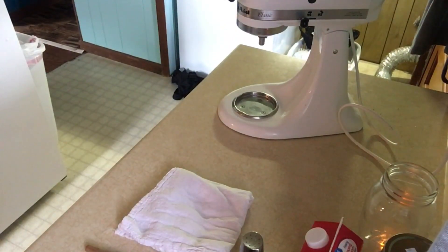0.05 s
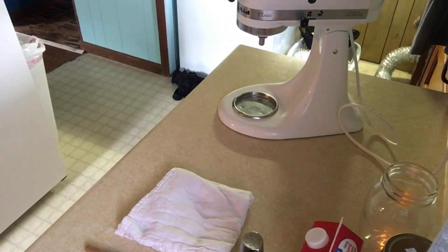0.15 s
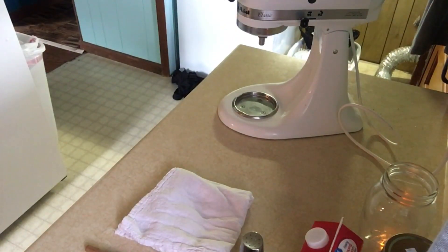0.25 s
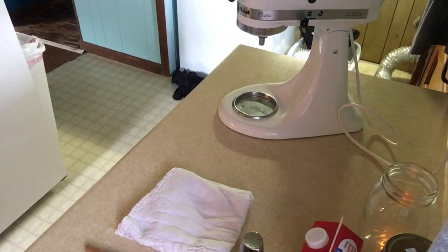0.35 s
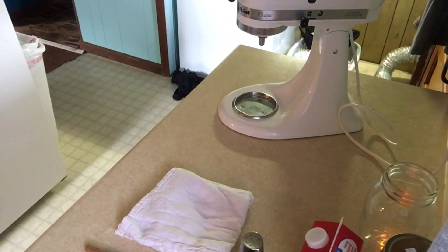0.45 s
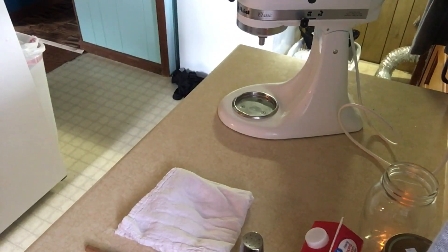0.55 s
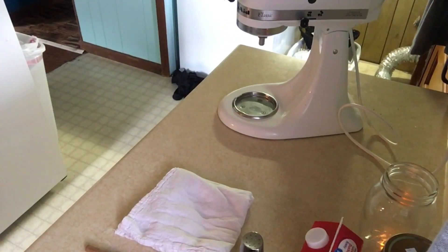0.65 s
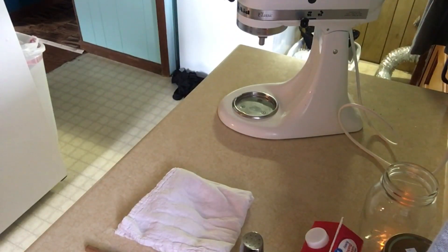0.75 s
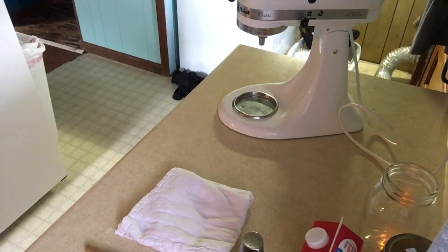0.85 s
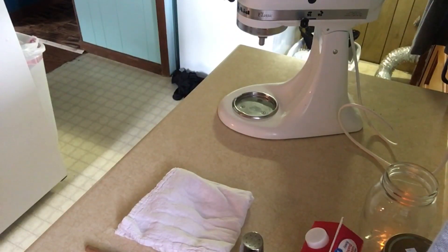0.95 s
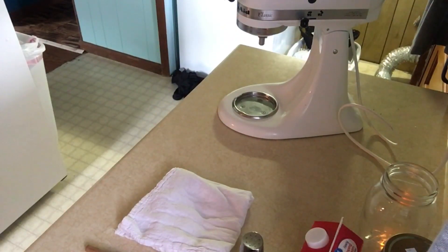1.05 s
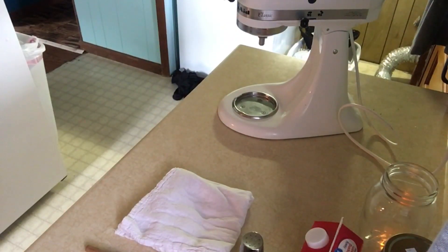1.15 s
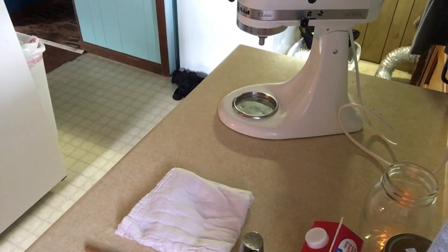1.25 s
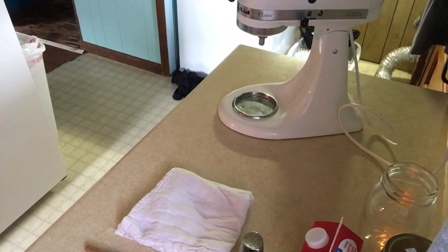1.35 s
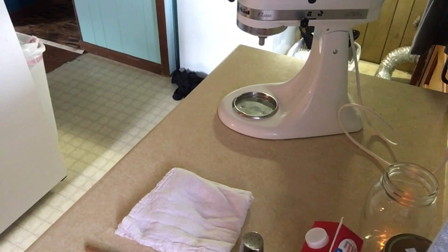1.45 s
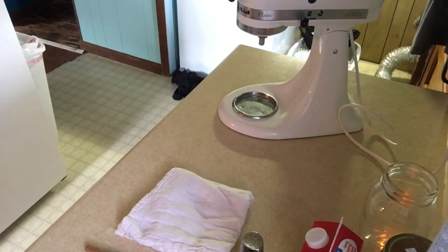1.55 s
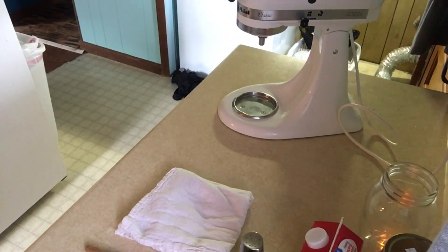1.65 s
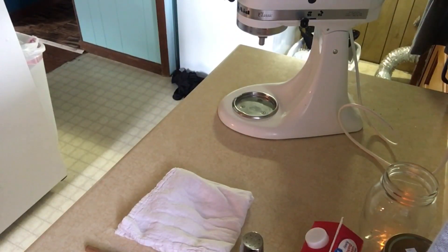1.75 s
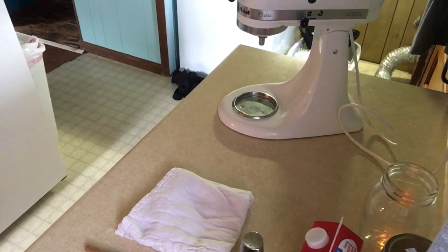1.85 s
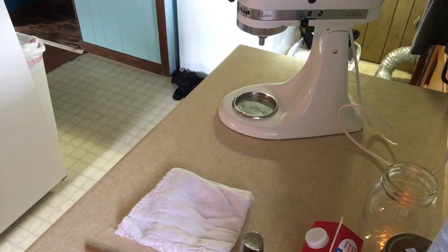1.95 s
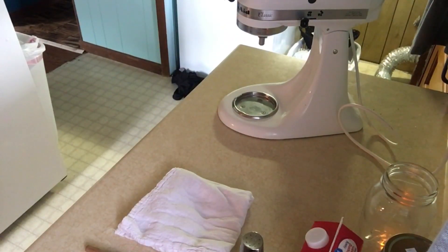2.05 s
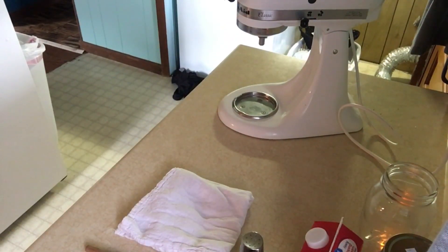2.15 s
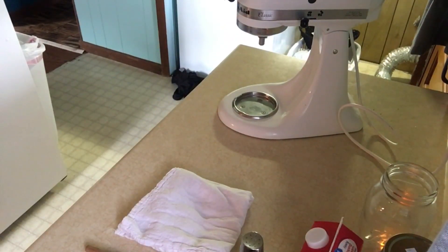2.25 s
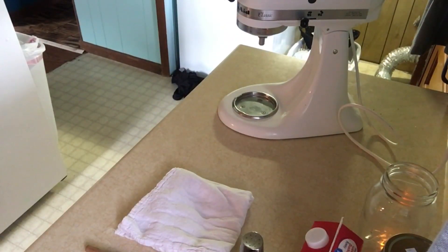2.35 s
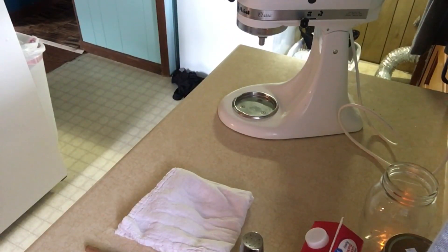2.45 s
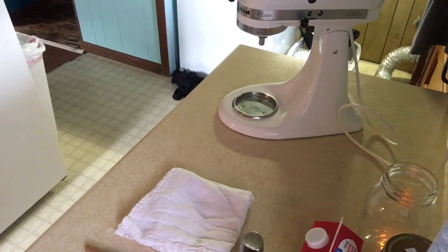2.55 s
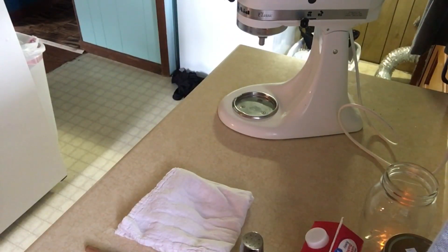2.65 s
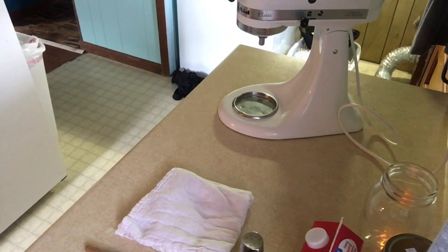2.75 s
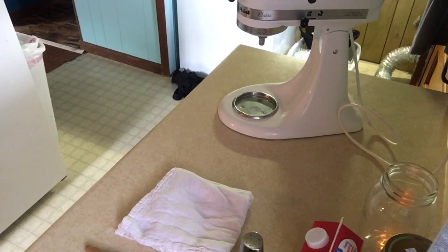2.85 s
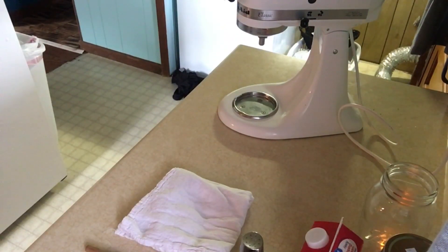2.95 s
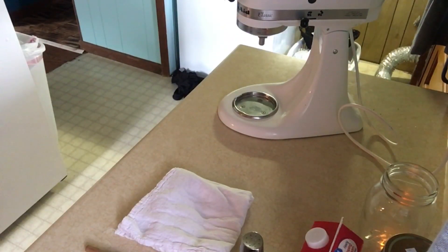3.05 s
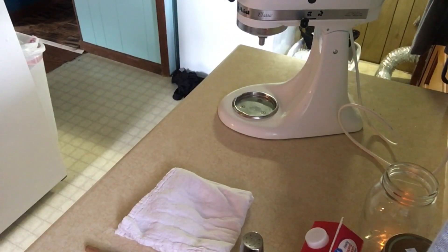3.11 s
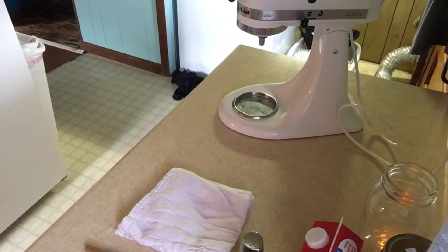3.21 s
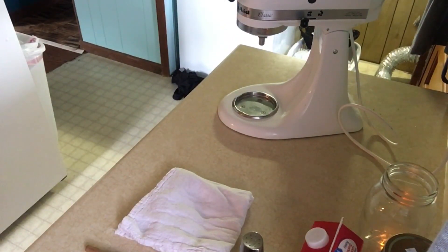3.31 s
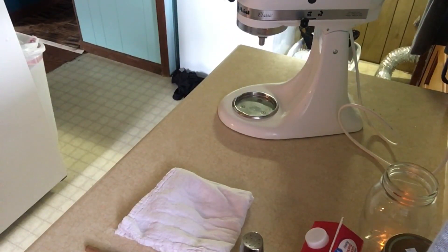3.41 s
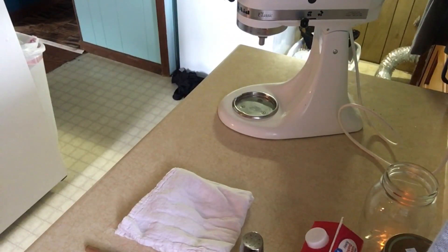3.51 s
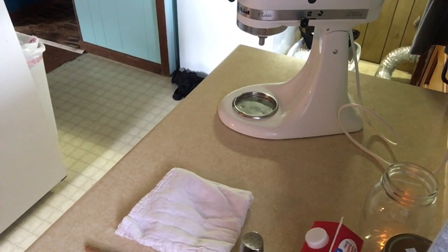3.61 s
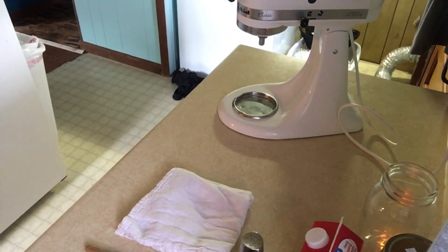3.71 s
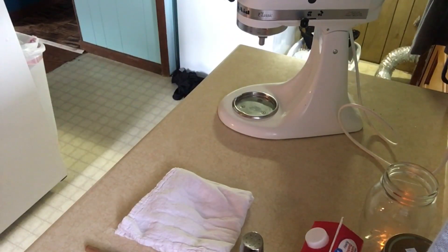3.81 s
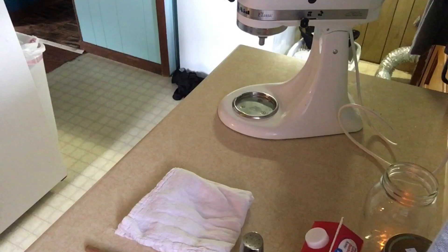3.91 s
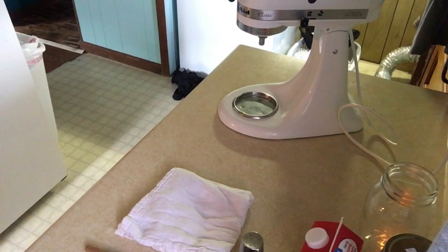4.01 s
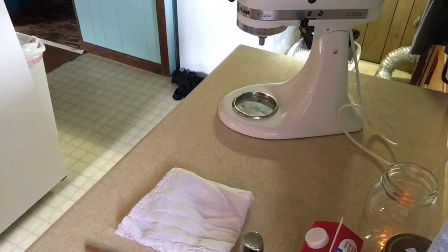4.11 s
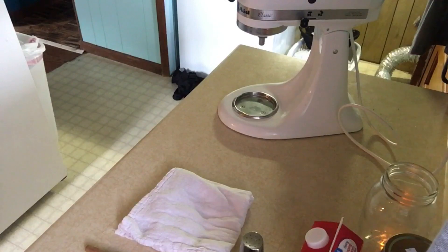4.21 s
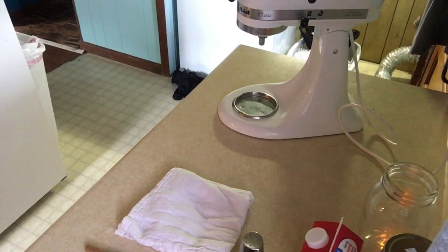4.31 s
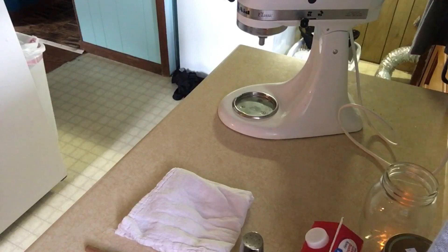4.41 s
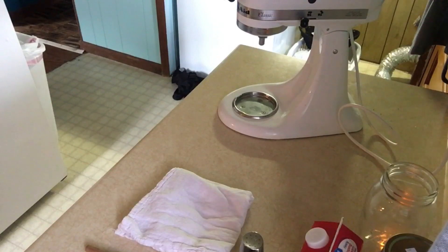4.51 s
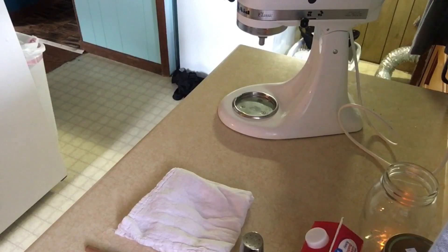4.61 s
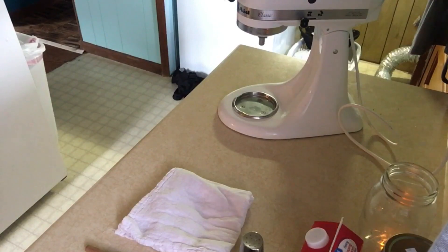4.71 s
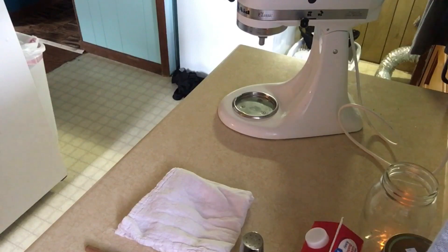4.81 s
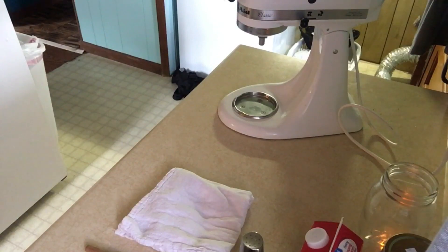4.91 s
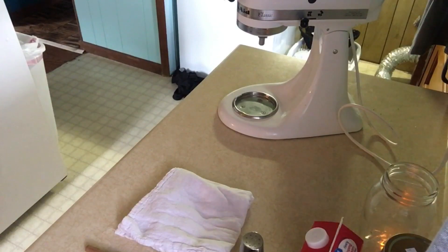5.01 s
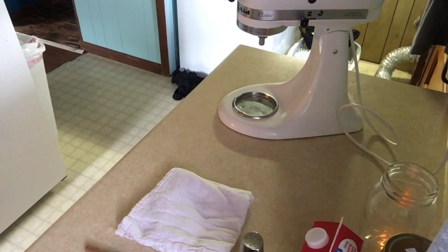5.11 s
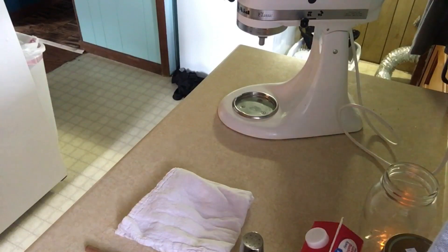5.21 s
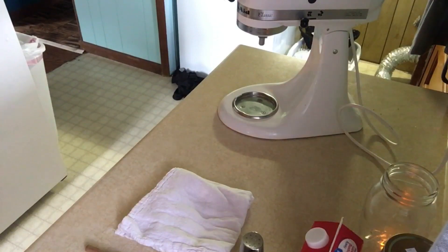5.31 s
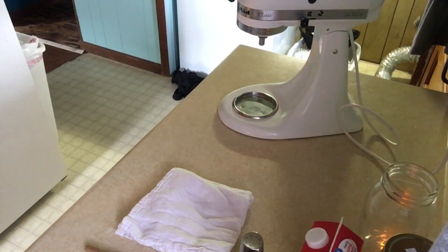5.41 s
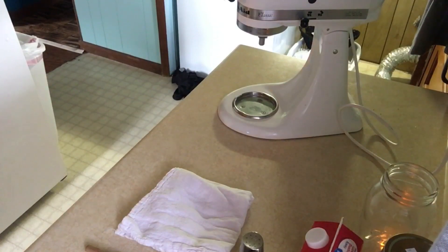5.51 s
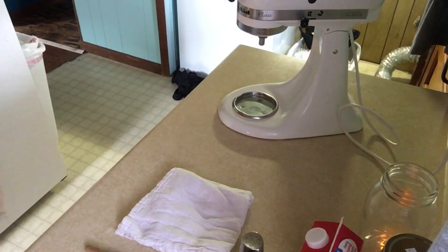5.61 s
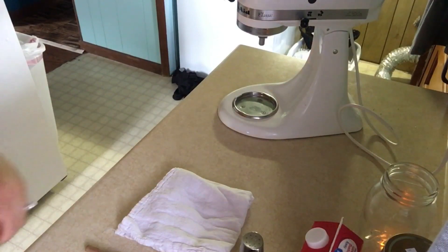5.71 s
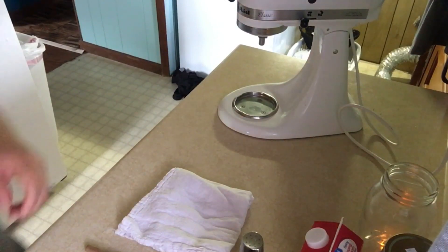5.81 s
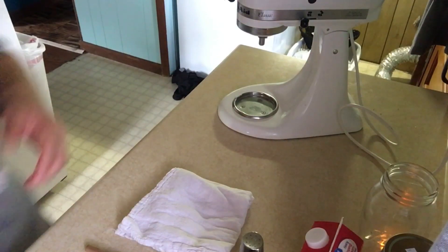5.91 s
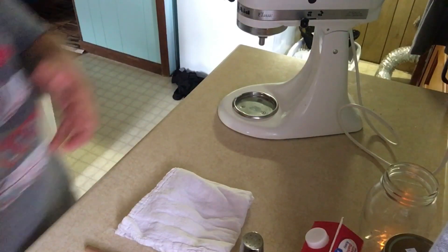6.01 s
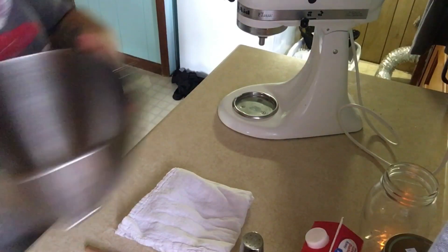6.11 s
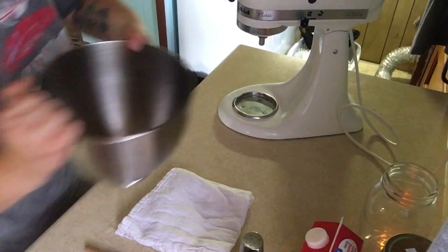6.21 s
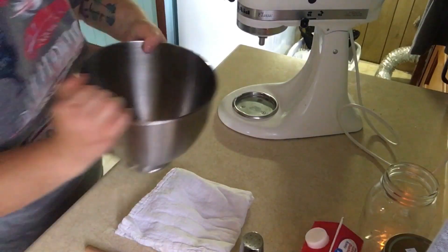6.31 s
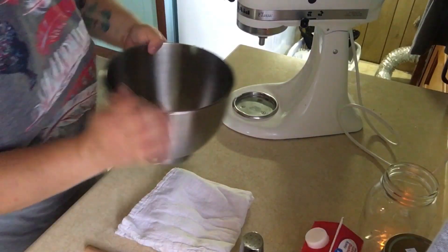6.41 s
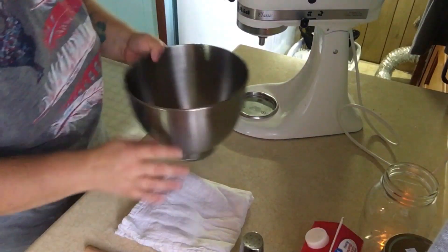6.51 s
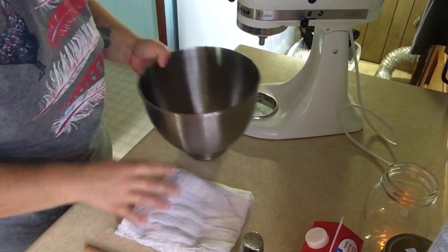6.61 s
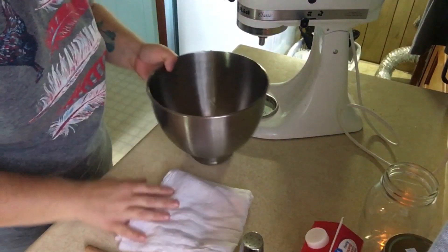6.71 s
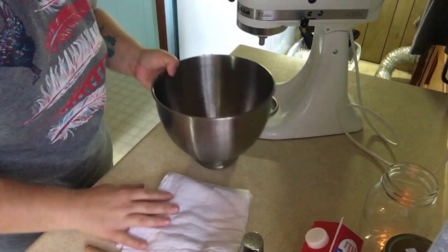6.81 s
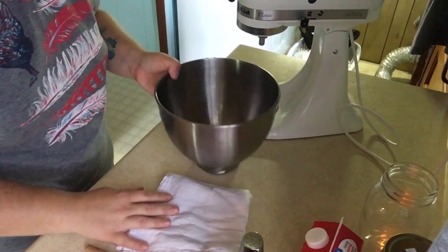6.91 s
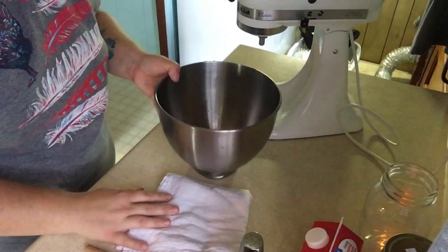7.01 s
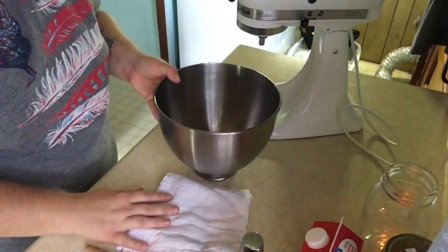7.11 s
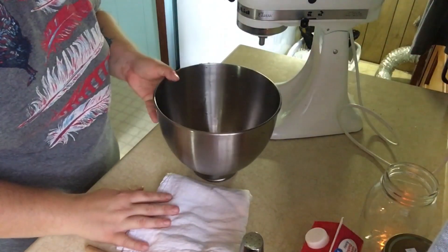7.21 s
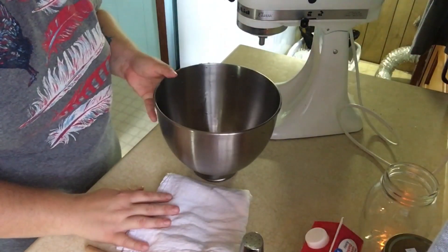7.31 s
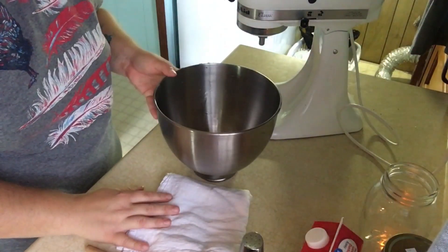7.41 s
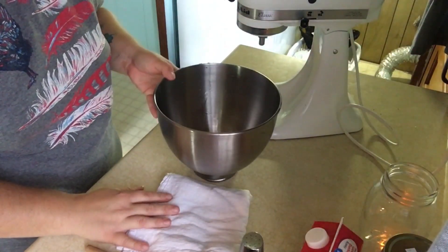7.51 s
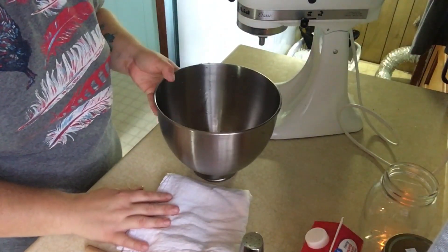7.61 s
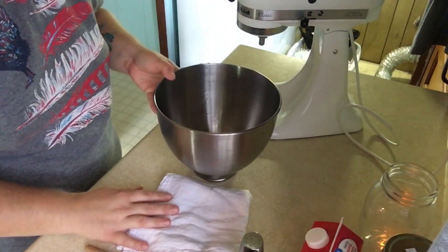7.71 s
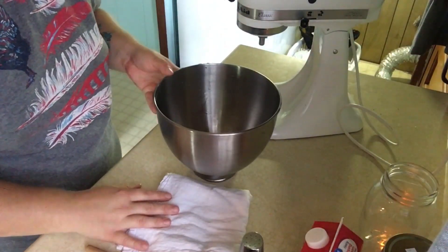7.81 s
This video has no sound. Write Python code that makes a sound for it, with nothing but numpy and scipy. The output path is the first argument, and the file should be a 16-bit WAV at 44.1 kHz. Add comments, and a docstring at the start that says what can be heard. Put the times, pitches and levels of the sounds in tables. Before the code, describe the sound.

A low room murmur lies under everything, in a small kitchen with a short echo. From 0 s a tap across the room hisses and splashes into a steel bowl, spray shifting as the bowl turns, the basin drumming softly underneath. A light clank and thumps come in the first 0.2 s, with dull bumps near 0.9 and 1.4 s. At about 3.7 s the jet quickly dies; from 3.9 to 4.8 s rinse water slops, glugs and gushes out in bubbly clumps, with a thump at 4.6. At 5.3 s the bowl clangs hard on the sink, bright and ringing, with hollow booms tumbling until 5.7. A faint drain trickle with small plinks remains. Cloth rustles and light ticks pass from 6.1 to 6.6 s. At 6.7 s the bowl lands sharply on the nearby counter, knocks more dully at 7.06, then soft towel presses follow, with a last tick and press around 7.7 s.

```python
"""In a kitchen, a tap runs into a steel mixer bowl and drums on the sink; the water is swirled and tipped out.
The bowl clanks on the sink, which booms, then is carried over and set down on the counter close by.
It knocks there once more and a hand presses on a towel while the drain goes on trickling.
Water is shaped noise plus chirping bubbles; steel, sink and counter are sets of dying tones plus short noise."""
import sys
import numpy as np
from scipy import signal
from scipy.fft import rfft, irfft, next_fast_len
from scipy.io import wavfile
from scipy.ndimage import map_coordinates

SR = 44100
rng = np.random.default_rng(int(sys.argv[2]) if len(sys.argv) > 2 else 0)


def materialize(psi):
    """Save the field psi as 16-bit PCM at rate SR to the path in sys.argv[1].

    A 1-D psi becomes a single channel; in a 2-D psi each row is a channel.
    """
    bounded = np.clip(np.atleast_2d(psi).T, -1, 1)
    quanta = np.round(bounded * 32767).astype(np.int16)
    wavfile.write(sys.argv[1], SR, quanta)


N = 346229
TIME = np.arange(N) / SR  # seconds through the scene
AGE = np.arange(SR * 2 // 3) / SR  # seconds since one blow or bubble began
# Levels in all tables are relative: the functions trim them when mixing.
# t60 is the time a sound takes to fall by 60 dB.


def amp(db):
    """Turn decibels into a gain."""
    return 10 ** (np.asarray(db) / 20)


def unit(x):
    """Scale to rms 1."""
    return x / np.sqrt(np.mean(x ** 2) + 1e-20)


def strike(x):
    """Scale a blow to rms 1 over its first 25 ms."""
    return x / np.sqrt(np.mean(x[:SR // 40] ** 2) + 1e-20)


def along(points, hz):
    """Read a curve of (f/Hz, value) points on a log frequency axis."""
    f, value = np.transpose(points)
    return np.interp(np.log(hz + 1), np.log(f), value)


def wobble(rate):
    """Draw a smooth random curve with rate knots a second."""
    knots = rng.standard_normal(int(N * rate / SR) + 4)
    return map_coordinates(knots, [TIME * rate])


def filtered(x, response):
    """Multiply the spectrum of x by a response of frequency."""
    m = next_fast_len(len(x) + 8192)
    hz = np.fft.rfftfreq(m, 1 / SR)
    return irfft(rfft(x, m) * response(hz), m)[:len(x)]


def coloured(x, spectrum):
    """Filter x by a spectrum table, then scale to rms 1."""
    return unit(filtered(x, lambda hz: amp(along(spectrum, hz))))


def hump(hz, centre_hz, octaves):
    """A bell-shaped gain on the log frequency axis."""
    return 1 / (1 + (np.log2((hz + 1) / centre_hz) / octaves) ** 2) ** 2


def gate(start, length, rise, release):
    """An envelope that builds from start, holds to the end of length seconds and dies away."""
    age = np.maximum(TIME - start, 0)
    return (1 - np.exp(-age / rise)) * np.exp(-np.maximum(age - length, 0) / release)


def add(track, s, x):
    """Mix x into the track at time s."""
    part = track[max(round(s * SR), 0):][:len(x)]
    part += x[:len(part)]


def burst(spectrum, t60, attack):
    """Countless short-lived tones heard together as dying noise."""
    noise = coloured(rng.standard_normal(len(AGE)), spectrum)
    return strike(noise * amp(-60 * AGE / t60) * (1 - np.exp(-AGE / attack)))


def puff(centre_hz, octaves, rise):
    """A band of noise that swells for rise seconds and dies away."""
    band = unit(filtered(rng.standard_normal(len(AGE)), lambda hz: hump(hz, centre_hz, octaves)))
    return band * AGE / rise * np.exp(1 - AGE / rise)


def ring(modes, attack, beat=0):
    """Dying tones; in a not quite round bowl each has a close twin that beats with it."""
    hz, db, t60 = np.transpose(modes)[:, :, None]
    phase, split = rng.random((len(hz), 2)).T[:, :, None]
    waves = np.sin(np.float32(2 * np.pi * (hz * AGE + phase)))
    if beat:
        twin_hz = hz + 8 + 16 * split
        waves = waves + beat * np.sin(np.float32(2 * np.pi * (twin_hz * AGE + phase)))
    decay = np.exp(-np.log(1000) * AGE / t60)
    return strike((amp(db) * decay * waves).sum(0) * (1 - np.exp(-AGE / attack)))


def bubble(t, hz, cycles, rise):
    """A bubble rings a few cycles and rises in pitch as it nears the surface."""
    life = hz * t / cycles
    tone = np.sin(2 * np.pi * hz * t * (1 + rise * life / (1 + life)))
    return tone * np.exp(-life) * (1 - np.exp(-10 * life))


def bubbles(rate, pitch_hz, spread, cycles, size_db, rise):
    """A random stream of rate bubbles a second at rms 1, with random pitches and levels."""
    when, size, u, v = rng.random((int(rate * N / SR), 4)).T[:, :, None]
    bell = np.sqrt(-2 * np.log(1 - u)) * np.cos(2 * np.pi * v)  # bell-curve random numbers
    hz = np.clip(pitch_hz * np.exp(spread * bell), 200, SR / 3)
    loudness = amp(-size_db * np.log(1 - .96 * size))  # many small, a few large
    t = AGE[:int(4 * SR * cycles / pitch_hz)]
    waves = bubble(np.float32(t), np.float32(hz), cycles, rise) * loudness
    at = (when * N).astype(int) + np.arange(len(t))
    return unit(np.bincount(at.ravel(), waves.ravel(), N)[:N])


# colour of the steady background: f/Hz, level/dB (per Hz)
BACKGROUND_COLOUR = [(25, -31), (40, -11), (60, 5), (99, -12), (145, 3), (190, -6), (260, -2), (350, -12.5),
                     (425, -10), (520, -13.5), (780, -16), (1020, -8), (1800, -18), (2700, -20),
                     (5300, -29.5), (8500, -37.5), (15800, -44.5)]


def background():
    """A steady low murmur made of coloured noise."""
    return amp(-51) * coloured(rng.standard_normal(N), BACKGROUND_COLOUR)


# the basin's tones under falling water: f/Hz, width/Hz, level/dB
DRUM_TONES = [(70, 18, -4), (116, 28, -14), (152, 12.5, 3), (179, 12, -27), (225.5, 9, -5.5),
              (251, 25, -7.5), (314.5, 8.7, -5.5), (440, 15, -18)]


def drumming():
    """Falling water shakes the basin at its resonances: filtered noise at rms 1."""
    def basin(f):
        response = 0
        for k, (centre, width, db) in enumerate(DRUM_TONES):
            damping = 1j * f * width
            sign = (-1) ** k  # neighbours swing opposite ways
            response = response + sign * amp(db) * damping / (centre ** 2 - f ** 2 + damping)
        return response
    return unit(filtered(rng.standard_normal(N), basin))


# the jet as the bowl turns under it: t/s, splash level/dB, spray level/dB
JET_LEVELS = [(0, -46, -53), (.6, -50, -54), (.85, -46, -50.5), (1.55, -48, -53.5), (1.83, -47.5, -51),
              (1.97, -53.5, -57), (2.52, -50, -54.5), (3.1, -54, -60.5), (3.7, -51, -56)]
# colour of the splash: f/Hz, level/dB (per Hz)
SPLASH_COLOUR = [(300, -21), (560, -16), (800, -24), (1030, 1.5), (1450, 3.5), (2200, -3.5), (2550, 1),
                 (3400, -1), (4200, -4), (7000, -34), (12000, -56)]
# colour of the fine spray, also used when pouring: f/Hz, level/dB (per Hz)
SPRAY_COLOUR = [(2000, -10.5), (4200, -3.5), (5200, 0), (6800, -0.5), (8200, -5), (9500, -5.5),
                (10300, -12), (11300, -7.5), (15800, -10.5)]
TAP_OFF_S, TAP_FADE_S = 3.7, 0.18  # the jet leaves the bowl and dies away (time constant)
DRUM_DB, DRUM_SAG_DB_PER_S, DRUM_FADE_S = -50.5, 2, 1  # gathering water cushions the basin


def tap():
    """The jet splashes in the bowl, throws fine spray and drums on the basin."""
    s, splash_db, spray_db = np.transpose(JET_LEVELS)
    splash = amp(np.interp(TIME, s, splash_db) - 2.5)
    spray = amp(np.interp(TIME, s, spray_db))
    since_off = np.maximum(TIME - TAP_OFF_S, 0)
    clusters = amp(1.1 * wobble(13))  # air is dragged under in bunches
    froth = clusters * bubbles(rate=420, pitch_hz=2900, spread=.38, cycles=6, size_db=3.3, rise=.04)
    fizz = clusters * bubbles(rate=380, pitch_hz=5600, spread=.27, cycles=13, size_db=4, rise=.03)
    body = coloured(rng.standard_normal(N) + amp(-6.5) * froth, SPLASH_COLOUR)
    rough_hiss = rng.standard_normal(N) * amp(2.3 * wobble(400))
    mist = coloured(rough_hiss + amp(-10) * fizz, SPRAY_COLOUR)
    drum_level = amp(DRUM_DB - DRUM_SAG_DB_PER_S * TIME) * np.exp(-since_off / DRUM_FADE_S)
    flutter = amp(.8 * wobble(25))
    jet = flutter * np.exp(-since_off / TAP_FADE_S) * (splash * body + spray * mist)
    return jet + drum_level * drumming()


# the clearest bubbles in the drain: t/s, peak level/dB, f/Hz
PLINKS = [(5.223, -39.5, 2340), (6.595, -41, 2990), (6.6644, -45, 3520), (7.185, -43, 2500),
          (7.3761, -45, 3210), (7.5534, -44.5, 2950)]


def drain():
    """Water trickles down the drain as a stream of bubbles with a few clear plinks."""
    trickle = amp(-60) * bubbles(rate=100, pitch_hz=2400, spread=0.317, cycles=15, size_db=1, rise=0.065)
    for s, db, hz in PLINKS:
        add(trickle, s, amp(db + 1) * bubble(AGE, hz, cycles=26, rise=0.056))
    return trickle


def shimmer(count, low_hz=2600, octaves=2.3, tilt_db=-6, t60=0.54):
    """A crowd of high tones in the thin steel wall, weaker toward the top."""
    place, size, life = rng.random((count, 3)).T
    octave = (np.arange(count) + place) / count * octaves
    hz = low_hz * 2 ** octave
    level = tilt_db * octave - 10 * size
    return ring(np.transpose([hz, level, t60 * (.5 + life)]), attack=0.0015)


# the bowl clanks on the sink: t/s, peak level/dB, ring level/dB, brightness level/dB
CLANKS = [(0.057, -21, 8, -7), (5.34, -6.5, 2, -10), (5.492, -21, -11, -16)]
# noise of the clank, and its high sizzle: f/Hz, level/dB (per Hz)
CLASH_COLOUR = [(45, -4), (90, -11), (300, 6), (650, 1), (800, -9), (1150, 4.5), (1500, -5.5), (2400, -3.5),
                (4000, -9.5), (5500, -6), (9000, -55)]
SIZZLE_COLOUR = [(2500, -39), (4200, 1), (4900, -2.5), (5700, 1), (6300, 0), (7300, 2.5), (9000, -9),
                 (11000, -12), (15800, -14)]
# tones of the bowl struck on the rim: f/Hz, level/dB, t60/s
RIM_TONES = [(1120, -1.5, 0.62), (1305, -9, .4), (1630, -17, 0.73), (2360, -8, .16), (4120, -8, 0.76),
             (4170, 0, 0.44), (4500, -3, .22), (5300, -15, 1), (5459, -3, .16), (6560, -15, 1),
             (7450, 0, .3), (9150, -14, 0.35), (9195, 10, .16), (11000, -1, 0.29)]
# blows on the basin: t/s, boom level/dB, boom f/Hz, knock level/dB, knock f/Hz, smack level/dB
THUMPS = [(0.055, -37, 330, -21, 476, -25), (0.199, -26, 330, -22.5, 414, -45),
          (0.89, -25, 153, -24.5, 420, -21.5), (1.434, -31, 150, -37, 304, -34),
          (4.602, -24, 227, -21.5, 330, -36), (5.34, -12, 174, -6, 270, -24),
          (5.373, -13.5, 150, -14.5, 580, -14.5), (5.428, -20.5, 140, -17.5, 514, -24),
          (5.489, -10, 246, -26, 252, -23), (5.571, -22, 280, -42, 400, -32.5),
          (5.624, -24, 244, -34, 279, -30), (5.7, -26.5, 238, -36, 251, -37)]
# tones of the basin: f/Hz, level/dB, t60/s
BASIN_TONES = [(54.6, 6, 0.92), (97, 4.5, .11), (148.2, 3, .3), (229.8, 2, 0.17), (264, 2, 0.17),
               (330, -12.5, 0.14), (422.7, -3.5, 0.16), (525, -11, 0.047), (631, -0.5, 0.08)]
# noise of the smack: f/Hz, level/dB (per Hz)
SMACK_COLOUR = [(200, -12), (500, 5), (750, -15.5), (1100, 2.5), (2000, -4), (2800, -12), (10000, -27)]
# the bowl judders along the basin: t/s, length/s, level/dB, centre f/Hz
SCRAPES = [(0.217, 0.061, -44, 427), (5.578, .035, -47.5, 427)]


def sink():
    """The rim clashes and rings; the thin basin booms at a pitch that depends on where it is hit."""
    out = np.zeros(N)
    for s, db, ring_db, bright_db in CLANKS:
        sizzle = burst(SIZZLE_COLOUR, t60=0.075, attack=.0007) + amp(-12) * shimmer(count=40)
        clash = burst(CLASH_COLOUR, t60=0.24, attack=0.00023) + amp(bright_db + 3.5) * sizzle
        # a gentle touch lasts longer and wakes fewer of the high tones
        reach_hz = 22000 * amp(db - 3)
        modes = [(hz, level - 40 * np.log10(1 + (hz / reach_hz) ** 2), t60) for hz, level, t60 in RIM_TONES]
        steel = ring(modes, attack=0.0026, beat=0.35)
        add(out, s - .001, amp(db - 17) * clash + amp(db + ring_db - 28) * steel)
    for s, boom_db, boom_hz, knock_db, knock_hz, smack_db in THUMPS:
        # tones near the boom's pitch answer most
        modes = [(hz, level + 20 * np.log10(hump(hz, boom_hz, octaves=1)), t60)
                 for hz, level, t60 in BASIN_TONES]
        boom = amp(boom_db - 13.5) * ring(modes, attack=0.0042)
        knock = amp(knock_db - 11) * puff(knock_hz, octaves=0.69, rise=0.0051)
        smack = amp(smack_db - 17.5) * burst(SMACK_COLOUR, t60=0.1, attack=0.00058)
        add(out, s, boom + knock + smack)
    for s, length, db, hz in SCRAPES:
        slips = rng.standard_normal(N) * amp(4.8 * wobble(170))
        judder = unit(filtered(slips, lambda f: hump(f, hz, octaves=0.81)))
        out += amp(db) * gate(s, length, rise=0.011, release=.035) * judder
    return out


# the jet drags under a bunch of bubbles: t/s, length/s, level/dB, f/Hz
SPURTS = [(0.47, 0.025, -51.5, 2980), (0.59, 0.024, -52, 5000), (.9, 0.052, -53, 6270),
          (1.065, 0.074, -56, 6440), (1.112, 0.026, -50, 3100), (1.182, 0.083, -53, 3120),
          (1.283, 0.013, -47, 6670), (1.35, 0.033, -51.5, 3160), (1.698, .11, -55.5, 6500),
          (1.742, .06, -45.5, 3030), (1.813, 0.028, -54, 4300), (2.11, 0.022, -51, 5200),
          (2.269, 0.037, -57.5, 7240), (2.481, 0.046, -51, 4260), (2.534, 0.03, -51.5, 3740),
          (2.635, 0.018, -52, 5300), (3.066, 0.02, -56, 6940), (3.352, 0.017, -52, 2880),
          (3.493, 0.021, -53, 4600), (3.569, 0.013, -50, 2770), (3.669, 0.033, -51, 5160),
          (3.697, 0.039, -49.5, 3100)]


def spatter(count=10, spread_octaves=.3, size_db=9):
    """Bunches of bubbles, alike in pitch, burst out of the hiss of the tap."""
    out = np.zeros(N)
    for s, length, db, hz in SPURTS:
        bunch = np.zeros(len(AGE))
        for when, pitch, size in rng.random((count, 3)):
            pitch_hz = hz * 2 ** (spread_octaves * (2 * pitch - 1))
            one = bubble(AGE[:2048], pitch_hz, cycles=11.5, rise=0.042)
            add(bunch, when * length, amp(-size_db * size) * one)
        even = np.sqrt(length * SR / np.sum(bunch ** 2))  # same power for every bunch
        add(out, s, amp(db) * bunch * even)
    return out


# sheets of water tipped out of the bowl: t/s, length/s, splash level/dB, spray level/dB
POURS = [(3.96, 0.073, -45.5, -62), (4.126, 0.033, -48, -51), (4.27, 0.026, -48, -81),
         (4.369, 0.048, -38, -46.5), (4.434, 0.07, -36, -54), (4.552, 0.069, -36.5, -50.5),
         (4.682, 0.053, -42.5, -60), (4.736, .09, -44.5, -60)]
# colour of the bubbly gush: f/Hz, level/dB (per Hz)
GUSH_COLOUR = [(150, -32), (260, 7), (435, 1.5), (484, -10), (663, 6.5), (780, -19), (950, -6),
               (1250, -2.5), (1650, -8), (2650, -2.5), (2920, -8.5), (3500, 0.5), (9000, -20.5),
               (11700, -41)]
# slops of water: t/s, peak level/dB, bubble f/Hz
SLOPS = [(3.932, -23.5, 2210), (3.976, -24, 2040), (4.01, -29, 2940), (4.026, -24, 2100),
         (4.036, -17.5, 2350), (4.056, -19, 3070), (4.293, -32, 2110), (4.311, -49, 2440),
         (4.442, -21, 1670), (4.501, -22, 1520), (4.548, -21, 1980), (4.574, -21.5, 1730),
         (4.612, -20, 1350), (4.742, -21, 1304), (4.811, -18, 1770)]
# big air pockets glug in the rinse water: t/s, peak level/dB, f/Hz
GLUGS = [(3.938, -33, 529), (4.062, -37.5, 705), (4.151, -35, 424), (4.456, -35, 665), (4.504, -35, 635),
         (4.602, -25, 445), (4.737, -26.5, 650)]
# spray comes first, the bubbly gush builds behind it (time constants)
SPRAY_RISE_S, GUSH_RISE_S, POUR_RELEASE_S = 0.0047, 0.033, 0.063
POUR_DRUM_DB, POUR_DRUM_RELEASE_S = 1, 0.073  # the basin under a sheet, relative to its spray
SLOP_SPRAY_DB = -18.5  # flying drops, relative to the slop


def pour():
    """Rinse water slops round the bowl and falls into the sink in bubbly clumps."""
    froth = bubbles(rate=220, pitch_hz=2200, spread=.4, cycles=9, size_db=3.6, rise=.12)
    gush = coloured(rng.standard_normal(N) + amp(-2) * froth, GUSH_COLOUR)
    mist = coloured(rng.standard_normal(N) * amp(4.1 * wobble(500)), SPRAY_COLOUR)
    drum = drumming()
    water = np.zeros(N)
    for s, length, splash_db, spray_db in POURS:
        water += amp(splash_db) * gate(s, length, GUSH_RISE_S, POUR_RELEASE_S) * gush
        water += amp(spray_db) * gate(s, length, SPRAY_RISE_S, POUR_RELEASE_S) * mist
        drum_level = amp(spray_db + POUR_DRUM_DB)
        water += drum_level * gate(s, length, SPRAY_RISE_S, POUR_DRUM_RELEASE_S) * drum
    water *= amp(3.4 * wobble(45))  # the sheets fall unevenly
    for s, db, hz in SLOPS:
        clump = puff(hz, octaves=.8, rise=.005) + amp(4) * bubble(AGE, hz, cycles=12, rise=.12)
        drops = amp(SLOP_SPRAY_DB) * burst(SPRAY_COLOUR, t60=0.19, attack=0.0026)
        add(water, s - .001, amp(db - 15.5) * (clump + drops))
    for s, db, hz in GLUGS:
        add(water, s, amp(db - 3) * bubble(AGE, hz, cycles=7.4, rise=0.031))
    return water


# cloth rustles as the bowl is carried, then the bowl slides or a hand brushes the towel:
# t/s (of the middle), length/s, level/dB
BRUSHES = [(6.2, 0.066, -52.5), (6.366, 0.14, -52.5), (6.467, 0.018, -51), (7.027, 0.12, -57.5)]
# colour of the rustling: f/Hz, level/dB (per Hz)
RUSTLE_COLOUR = [(700, -26), (1800, 11.5), (3500, 5), (7000, -1.5), (15800, -23)]
# light handling ticks: t/s, peak level/dB, centre f/Hz, click level/dB
TICKS = [(6.13, -26.5, 960, -26), (6.1832, -23.5, 1460, -28), (6.503, -31.5, 1060, -14),
         (6.5239, -25, 1260, 5), (6.587, -24.5, 890, -24), (7.653, -27.5, 1010, -16.5)]
# colour of the click in a tick: f/Hz, level/dB (per Hz)
CLICK_COLOUR = [(1200, 0), (3000, 2.5), (6500, 8), (10000, 1.5), (15800, -4)]


def handling():
    """Rustles and brushes are swells of rough noise; fingers tick on the bowl as short puffs."""
    level = sum(amp(db) * np.exp(-(2 * (TIME - s) / length) ** 2) for s, length, db in BRUSHES)
    out = level * coloured(rng.standard_normal(N) * amp(3 * wobble(130)), RUSTLE_COLOUR)
    for s, db, hz, click_db in TICKS:
        click = amp(click_db) * burst(CLICK_COLOUR, t60=0.056, attack=0.0027)
        add(out, s - .002, amp(db - 20) * (puff(hz, octaves=0.87, rise=0.0061) + click))
    return out


# the bowl's foot lands, edge first and then flat: t/s, peak level/dB, crack level/dB, bowl ring level/dB
KNOCKS = [(6.709, -7, -16.5, -10), (6.721, -11.5, -19.5, -25), (7.061, -11.5, -26.5, -32.5),
          (7.07, -15, -22.5, -27)]
# soft presses on the counter: t/s, peak level/dB, brush level/dB
PRESSES = [(7.126, -21, -5), (7.15, -20, -9), (7.165, -18.5, -34), (7.184, -21, -37), (7.762, -23.5, -12.5)]
# tones of the counter top: f/Hz, level/dB, t60/s
COUNTER_TONES = [(90, -22, 0.083), (149.5, -8, 0.3), (272.2, -3.5, 0.14), (364, 3, 0.074), (516, 0, 0.069),
                 (563, -6, 0.077), (689.6, 1.5, 0.1), (955, -7.5, 0.069), (1039, -2, 0.051),
                 (1211, -4, 0.059), (1400, -7.5, 0.062), (1610, -10.5, 0.038), (1805, -14.5, 0.11)]
# tones of the bowl struck on its foot: f/Hz, level/dB, t60/s
FOOT_TONES = [(3005, 12, 0.31), (4110, -12.5, 1), (4240, 18, 0.096), (4240, -15.5, 0.86), (4522, -15, 0.54),
              (5370, 1, .19), (5620, 8, .15), (5720, -19, 1.3), (5840, 10, 0.14), (7300, -24, 1),
              (7838, -28, 1.2), (8900, -29, .9), (10100, -29, 0.43), (11260, -25, .5)]
# noise of the dull thud, and of the sharp crack: f/Hz, level/dB (per Hz)
THUD_COLOUR = [(40, -42), (80, -1), (300, 5), (700, 0), (850, -7.5), (1250, -11.5), (2000, -30),
               (3000, -34), (4500, -38), (8000, -69)]
CRACK_COLOUR = [(700, -16), (1200, 8), (2400, -2), (3500, -8.5), (5000, -17.5), (6000, -15), (8000, -20),
                (10500, -30), (15800, -36)]


def counter():
    """Hard blows ring the counter top and the bowl on it; soft presses stir mostly its low tones."""
    out = np.zeros(N)
    for s, db, crack_db, ring_db in KNOCKS:
        slab = ring(COUNTER_TONES, attack=0.0027)
        thud = amp(-3.5) * burst(THUD_COLOUR, t60=0.13, attack=.001)
        top = amp(-7) * (slab + thud)
        crack = amp(crack_db + 1) * burst(CRACK_COLOUR, t60=0.16, attack=0.00021)
        bowl = ring(FOOT_TONES, attack=0.0023, beat=0.6) + amp(-28) * shimmer(count=40)
        add(out, s - .001, amp(db) * (top + crack + amp(ring_db - 11) * bowl))
    soft = [(hz, level - 40 * np.log10(1 + (hz / 210) ** 2), t60) for hz, level, t60 in COUNTER_TONES]
    for s, db, brush_db in PRESSES:
        press = amp(-14.5) * ring(soft, attack=0.0072)
        brush = amp(brush_db - 8) * burst(THUD_COLOUR, t60=0.11, attack=0.0033)
        add(out, s, amp(db) * (press + brush))
    return out


# how long the kitchen echoes: f/Hz, t60/s
KITCHEN_ECHO = [(100, 0.31), (1000, 0.32), (5000, 0.23), (15000, 0.3)]


def room(x):
    """The kitchen's short echo: x smeared by noise that dies at its own speed in each band."""
    hz, t, z = signal.stft(rng.standard_normal(SR // 2), SR, nperseg=256)
    fading = z * amp(-60 * t / along(KITCHEN_ECHO, hz)[:, None])
    tail = signal.istft(fading, SR, nperseg=256)[1]
    tail *= 1 - np.exp(-np.arange(len(tail)) / SR / 0.0027)  # the echo builds up softly
    return signal.fftconvolve(x, tail / np.linalg.norm(tail))[:N]


def scene():
    """The sink is across the room; the counter is close by, so it gets the least echo."""
    water = tap() + drain() + spatter() + pour()
    far = sink()
    near = handling() + counter()
    echo = amp(-7.5) * room(water) + amp(-9) * room(far) + amp(-14) * room(near)
    return (amp(-1.5) * water + far + near + echo + background())[None]


TOP_HZ = 15850  # middle of the cut, which is 400 Hz wide


def record(dry):
    """Remove everything above the top of the band."""
    return filtered(dry[0], lambda hz: np.clip((TOP_HZ - hz) / 400 + .5, 0, 1))[None]


dry = scene()
out = record(dry)
materialize(out)
```